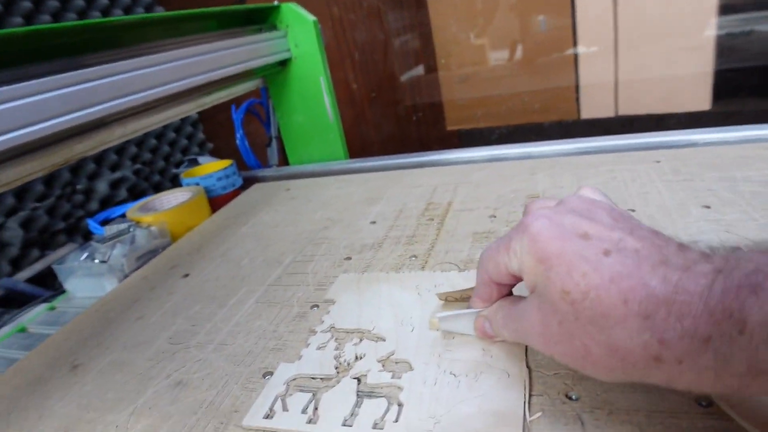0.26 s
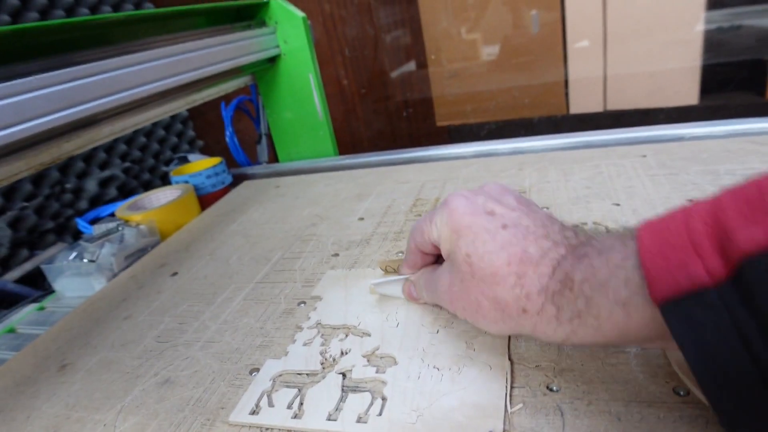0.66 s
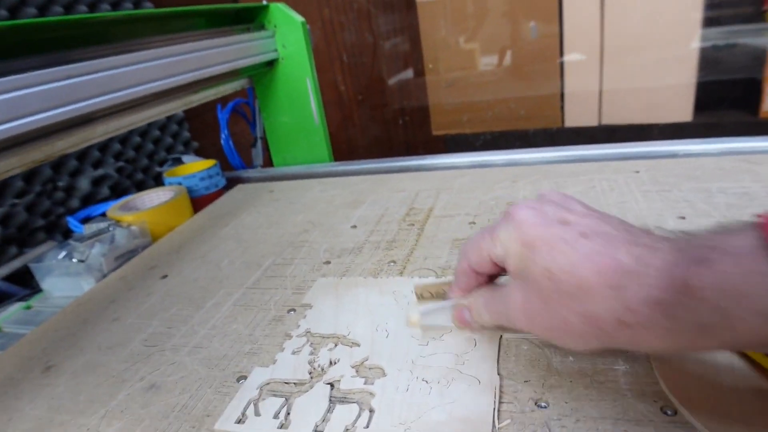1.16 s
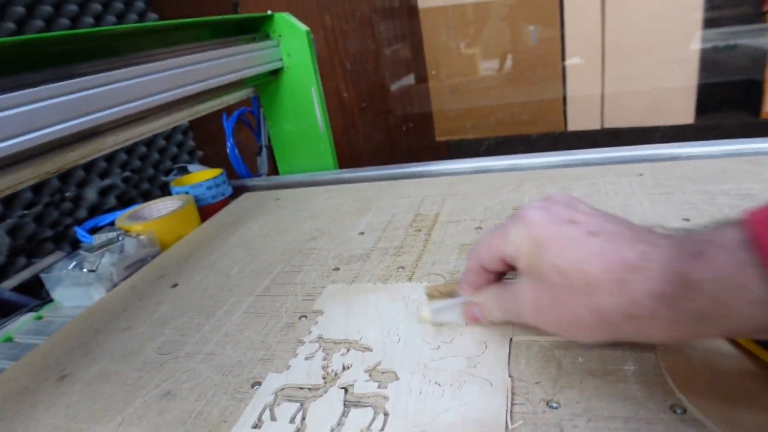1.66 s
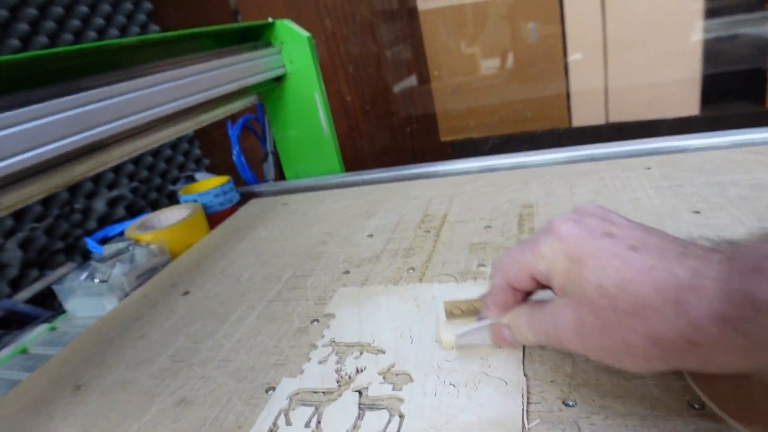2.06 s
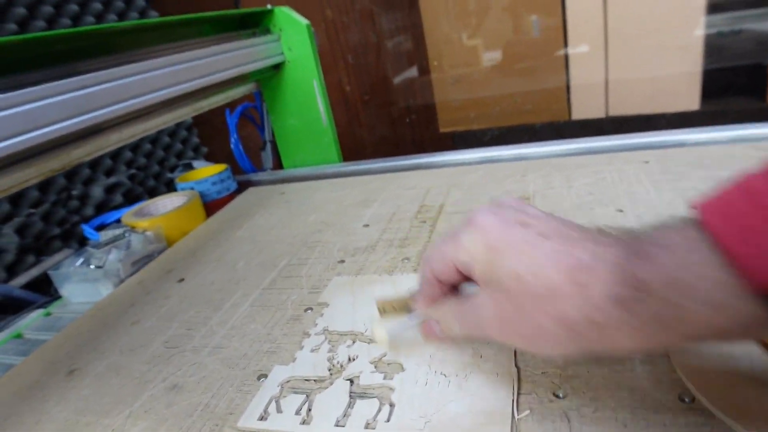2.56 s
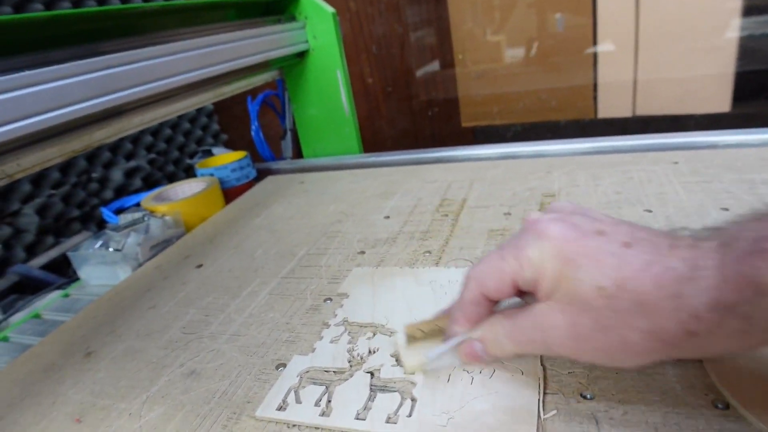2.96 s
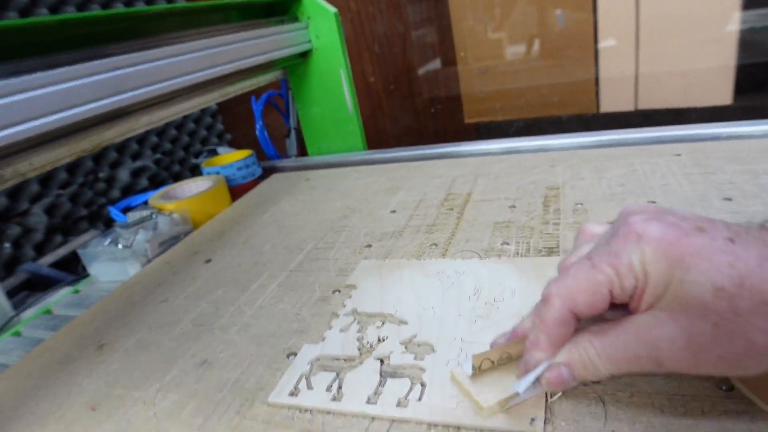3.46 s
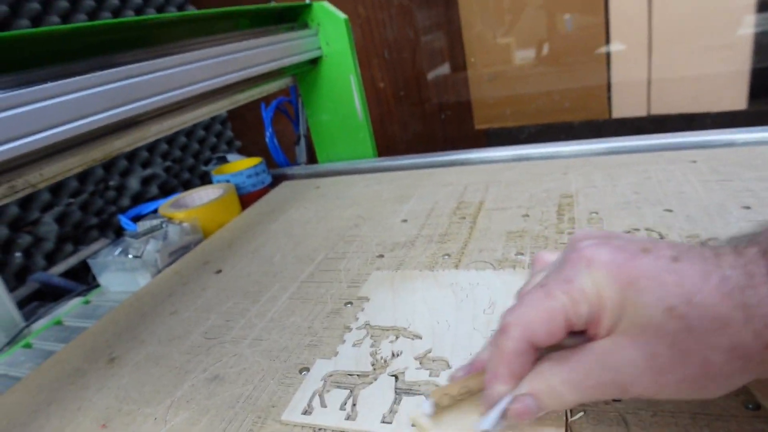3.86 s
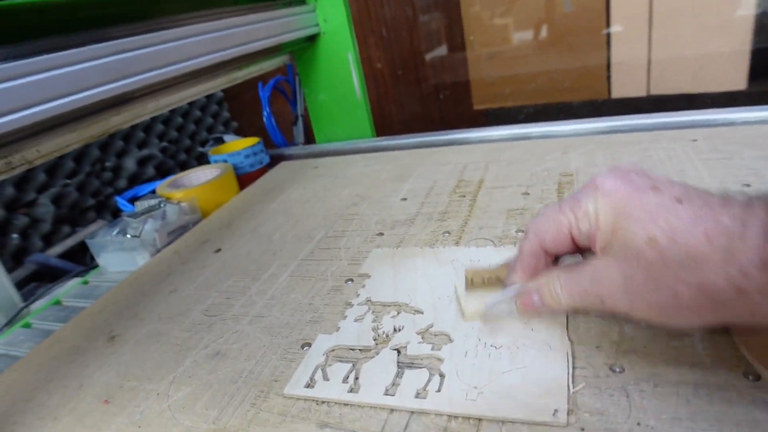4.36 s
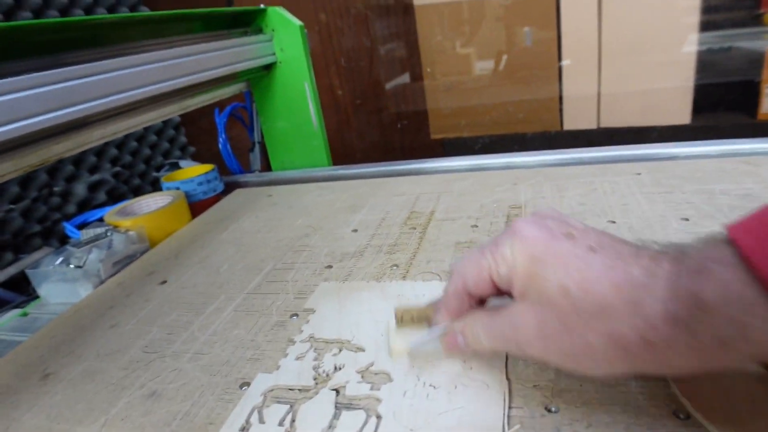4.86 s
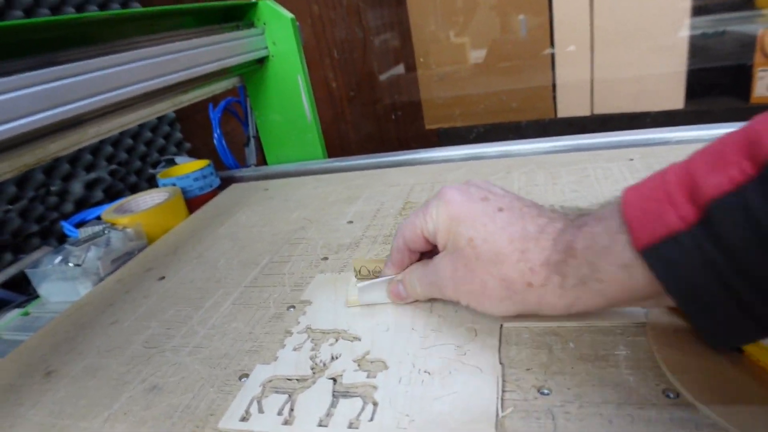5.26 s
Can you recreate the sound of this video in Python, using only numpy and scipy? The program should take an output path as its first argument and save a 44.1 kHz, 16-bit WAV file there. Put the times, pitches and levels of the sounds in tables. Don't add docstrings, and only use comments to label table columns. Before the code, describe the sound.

In a workshop, stiff bristles rasp back and forth over a thin wooden sheet right by a small microphone with little bass. An isolated early stroke leads to steady, rapid scrubbing. Light wooden ticks and dull knocks come irregularly, then a run of loud, bright clacks around the middle, easing back to plain scrubbing. Low machine hum, soft air and a very faint whine stay underneath.

```python
import sys
import numpy as np
from scipy import signal
from scipy.io import wavfile
from scipy.ndimage import uniform_filter1d

SR = 44100
rng = np.random.default_rng(int(sys.argv[2]) if len(sys.argv) > 2 else 0)


def bounce(signal):
    frames = np.transpose(np.atleast_2d(signal))
    limited = np.clip(frames, -1, 1)
    pcm = np.round(limited * 32767).astype(np.int16)
    wavfile.write(sys.argv[1], SR, pcm)


def voltage_ratio(decibels):
    exponent = np.asarray(decibels, float) / 20
    return 10 ** exponent


N = 243431


def evened(x):
    return x / np.sqrt(np.mean(x ** 2) + 1e-20)


def read(points, hz):
    f, value = np.transpose(points)
    return np.interp(np.log(hz + 1), np.log(f + 1), value)


def hump(hz, centre_hz, log_width):
    return np.exp(-(np.log((hz + 1) / centre_hz) / log_width) ** 2)


def add(mix, start_s, sound):
    part = mix[:, round(start_s * SR):][:, :sound.shape[-1]]
    part += sound[..., :part.shape[1]]


def decay(t, t60_s, rise_s):
    return voltage_ratio(-60 * t / t60_s) * (1 - np.exp(-t / rise_s))


def ring(hz, t60_s, rise_s, count=3000):
    t = np.arange(count) / SR
    return decay(t, t60_s, rise_s) * np.sin(2 * np.pi * hz * t)


def band(x, low_hz, high_hz):
    return evened(signal.lfilter(*signal.butter(2, [low_hz, high_hz], "bandpass", fs=SR), x))


def ports(pair, field_db, size=256):
    # frequency in Hz, left-right likeness (0-1).
    likeness = [(60, 1), (400, 0.98), (1500, 0.99), (2200, 0.97), (7000, 0.95), (8200, 0.9), (15000, 0.95)]
    # frequency in Hz, left minus right in dB.
    balance = [(60, 2), (1500, -1), (2200, -0.5), (7000, 1.5), (8200, -2), (12000, -4), (15000, -2.5)]
    hz, _, z = signal.stft(pair, SR, nperseg=size, noverlap=size * 3 // 4)
    apart = np.sqrt((1 - np.clip(read(likeness, hz), 0, 1)) / 2)[:, None]
    mid = np.sqrt(1 - apart ** 2) * z[0]
    side = apart * z[1]
    lean = voltage_ratio(read(balance, hz) / 2)[:, None]
    z = np.array([(mid + side) * lean, (mid - side) / lean]) * voltage_ratio(field_db(hz[:, None], z.shape[2]))
    return signal.istft(z, SR, nperseg=size, noverlap=size * 3 // 4)[1][:, :N]


def held(t):
    # time in s, weight on the sheet in dB, tip contact in dB, bristle ringing in Hz,
    # its swing along a push (0-1).
    grip_curve = [(0.0, 9.5, 4.5, 3800, .02), (0.11, 3, -1, 3960, .02), (0.4, -0.5, -1.5, 4200, 0),
                  (0.68, 3, 2, 3980, 0.14), (0.95, 4.5, 0.5, 4100, 0.02), (1.4, 2.5, 0, 3980, 0.16),
                  (2.0, 2, 0, 4440, 0), (2.3, 1.2, 2.5, 4250, 0.1), (3.05, 4, 2, 4070, 0),
                  (3.35, 0.5, -1, 4250, 0.12), (3.7, -1, -2, 4100, 0.04), (4.1, -2, -8.5, 4400, 0.03),
                  (4.2, 0, -8.5, 4150, 0.2), (4.32, 1, 2.5, 4170, 0.12), (4.62, -2.5, 2.3, 4480, 0.1),
                  (4.8, 1.5, 1.5, 4370, 0.02), (5.17, 0.7, -1, 4550, 0), (5.5, 0.5, -.2, 4600, 0.2)]
    s, *columns = np.transpose(grip_curve)
    return [np.interp(t, s, c) for c in columns]


def motion():
    # start in s, end in s, bristle pressure in dB,
    # lean to the end in dB.
    pushes = [(-0.085, 0.033, -31.0, -10.5), (0.336, 0.459, -32, 9.5), (0.612, 0.721, -27.5, 9),
              (0.879, 0.995, -28, 4), (1.151, 1.254, -26.5, 0), (1.389, 1.5, -29, 7.5),
              (1.645, 1.766, -28, 2), (1.904, 2.022, -27, 6.5), (2.163, 2.28, -27.5, 4.5),
              (2.423, 2.546, -26, 6), (2.705, 2.839, -26.5, 4), (2.999, 3.112, -28, 1.5),
              (3.277, 3.376, -29, 3.5), (3.528, 3.631, -27.5, 1.5), (3.768, 3.881, -29, 3.5),
              (4.027, 4.121, -34, 2), (4.263, 4.384, -28.5, -1), (4.501, 4.608, -29.5, 9),
              (4.731, 4.852, -30, 2.5), (4.979, 5.109, -31.5, 0), (5.232, 5.335, -32, 1),
              (5.458, 5.56, -30, 10)]
    # start in s, end in s, bristle pressure in dB, lean to the end in dB.
    pulls = [(0.043, 0.171, -30.5, -1.5), (0.469, 0.598, -31, 7.5), (0.739, 0.872, -29, 6),
             (1.009, 1.139, -28.5, 9.5), (1.27, 1.377, -31, 8.5), (1.518, 1.635, -31, 2.5),
             (1.781, 1.892, -32, 7), (2.037, 2.148, -32.0, 4.5), (2.292, 2.411, -29, 6.5),
             (2.562, 2.694, -28, 3.5), (2.86, 2.988, -30.5, 0), (3.128, 3.263, -27.5, 2),
             (3.4, 3.513, -29, 2.5), (3.648, 3.752, -31.5, 1.5), (3.889, 4.013, -32, 4.5),
             (4.142, 4.262, -37, -4), (4.394, 4.499, -31, 8), (4.622, 4.73, -31, 2),
             (4.861, 4.963, -32.5, 0.5), (5.116, 5.22, -33, 0), (5.348, 5.451, -31.5, 3)]
    # time in s, level in dB, length in s.
    touches = [
        (.2215, -40, 0.0059),
        (0.207, -69, .02),
        (0.278, -61, 0.023),
        (1.17, -63, .012),
        (3.628, -51, 0.0014),
        (4.527, -35.5, 0.018),
        (5.124, -39, 0.0076),
    ]
    usual_db = -30
    sheet_follows, tips_follow = 0.017, 0.12
    flip_after_s, flip_s, creep_db = 0.0095, 0.001, -3
    bite_db, bite_s = 2, 0.013

    t = np.arange(N) / SR
    rows = np.array(sorted(pushes + pulls))
    which = np.clip(np.searchsorted(rows[:, 0], t) - 1, 0, len(rows) - 1)
    start, end, db, lean_db = rows[which].T
    u = np.clip((t - start) / (end - start), 0, 1)
    speed = abs(np.sin(np.pi * u)) * (u < 1)
    gain = voltage_ratio(db + lean_db * (u - 0.5)) * speed ** (0.57 + 0.16 * u)

    since = t - start - flip_after_s
    flipped = 1 / (1 + np.exp(-np.clip(since / flip_s, -50, 50)))
    gain = gain * voltage_ratio(creep_db * (1 - flipped) + bite_db * flipped * np.exp(-abs(since) / bite_s))
    for touch_s, touch_db, length_s in touches:
        gain += voltage_ratio(touch_db) * (t > touch_s) * np.exp(-(abs(t - touch_s) / length_s) ** 3)

    weight_db, contact_db, _, _ = held((rows[:, 0] + rows[:, 1]) / 2)
    extra_db = rows[:, 2] - usual_db
    board_db = weight_db - (1 - sheet_follows) * extra_db
    tips_db = contact_db - (1 - tips_follow) * extra_db
    place = (2 * (which % 2) - 1) * np.cos(np.pi * u)
    return speed, gain, board_db[which], tips_db[which], which, place


def brush():
    # frequency in Hz, level in dB per Hz.
    scrub_colour = [(290, -48), (500, -14.5), (613, -39), (819, -14.5), (906, -17), (1360, -8),
                    (2040, -12.5), (3750, -3), (4660, -2.5), (5310, -3.5), (7860, 0), (9490, -4.5),
                    (12100, -5), (15100, -9.5), (16000, -70.5)]
    speed, gain, board_db, tips_db, which, place = motion()
    slips = (rng.random((N, 2)) < 14000 / SR) * rng.standard_normal((N, 2))
    slips = slips * voltage_ratio(2.7 * np.minimum(rng.exponential(1, (N, 1)), 2.5))
    tufts = evened(uniform_filter1d(rng.standard_normal(N), size=60))
    drive = (evened(slips) + 1.9 * rng.standard_normal((N, 2))).T * voltage_ratio(0.18 * tufts)
    grip = evened(uniform_filter1d(rng.standard_normal((which[-1] + 1, 129)), size=5, axis=1))

    def field(hz, frames):
        at = np.clip(np.arange(frames) * 64, 0, N - 1)
        patches = uniform_filter1d(rng.standard_normal((frames, len(hz))).T, size=4, axis=0)
        patches = evened(uniform_filter1d(patches, size=16, axis=1))
        low = 1 / (1 + (hz / 2300) ** 4)
        high = 1 / (1 + (8000 / (hz + 1)) ** 4)

        fast = speed[at] - 0.8
        bent = 1.34 * fast * (1 - low) * (1 - high)
        bent = bent - 8.1 * fast * low
        bent = bent + 5.0 * fast * high
        bent = bent + 0.34 * (1 - low) * np.tanh(np.gradient(speed[at]) * 30)
        bent = bent + 0.3 * (-0.5 - tips_db[at]) * hump(hz, 7400, 0.077)

        stroke = low * board_db[at] + high * tips_db[at]
        stroke = stroke + 1.1 * grip[which[at]].T

        weight_db, _, ring_hz, swing = held(at / SR)
        ring_hz = ring_hz * (1 + swing * place[at])
        pull = which[at] % 2
        ring_db = np.where(pull, 3.7, 4.5)
        under_db = np.where(pull, 4, 4.5) - 0.48 * weight_db
        bent = bent + ring_db * hump(hz, ring_hz, 0.25)
        bent = bent + under_db * hump(hz, 2500, 0.28)
        bent = bent + 0.85 * (weight_db - 2.0) / (1 + (hz / 1100) ** 6)
        return read(scrub_colour, np.minimum(hz, 15000)) + stroke + bent + 1.2 * patches

    return evened(ports(drive, field)) * gain


def fuzzy_tone(hz, width_hz, db):
    t = np.arange(N) / SR
    r = np.exp(-np.pi * width_hz / SR)
    z = rng.standard_normal((2, N)) + 1j * rng.standard_normal((2, N))
    for _ in range(2):
        z = signal.lfilter([1 - r], [1, -r], z)
    z = z[0] + 0.044 * np.array([z[1], -z[1]])
    return voltage_ratio(db) * evened((z * np.exp(2j * np.pi * hz * t)).real)


def room_air():
    # frequency in Hz, level in dB per Hz.
    air_colour = [(40, -46), (90, -48), (160, -34), (195, -3.5), (320, -9), (540, -23), (620, -39),
                  (1500, -12.5), (5500, -31), (10000, -54), (14000, -22), (16000, -37)]
    noise = rng.standard_normal((N, 2)).T
    air = ports(noise, lambda hz, frames: read(air_colour, hz), size=2048)
    return voltage_ratio(-65.5) * evened(air)


def fan():
    # frequency in Hz, width in Hz, level in dB rms.
    duct_modes = [
        (377.2, 30, -55),
        (402.4, 27.4, -57),
        (488, 40, -62),
        (89, 30, -83.5),
    ]
    return sum(fuzzy_tone(*row) for row in duct_modes)


def electronics():
    # time in s, level in dB rms.
    load_curve = [
        (0, -71),
        (2.4, -67),
        (3.4, -64),
        (4.3, -65),
        (5.5, -68),
    ]
    s, db = np.transpose(load_curve)
    return fuzzy_tone(15321, 5, np.interp(np.arange(N) / SR, s, db))


def coil():
    # frequency in Hz, width in Hz, level in dB rms.
    coil_tones = [
        (6013, 35, -62),
        (12015, 35, -72),
    ]
    end_s = 0.4
    fading = np.clip((end_s - np.arange(N) / SR) * 20, 0, 1)
    return fading * sum(fuzzy_tone(*row) for row in coil_tones)


def bumps():
    # time in s, peak in dB, pitch in Hz.
    hand_bumps = [(0.021, -51.5, 226), (0.082, -55, 230), (0.348, -46.5, 278), (0.419, -65, 194),
                  (0.669, -56, 248), (1.16, -54.5, 288), (1.461, -68.5, 218), (1.915, -59, 224),
                  (2.353, -57, 259), (2.434, -48, 234), (2.744, -53.5, 245), (2.822, -55.5, 208),
                  (3.034, -48, 252), (3.111, -58, 210), (3.21, -50, 226), (3.32, -49.5, 245),
                  (3.451, -74, 312), (3.586, -50, 233), (3.678, -64, 205), (3.819, -55.5, 223),
                  (3.905, -54, 208), (4.099, -48.5, 300), (4.301, -52, 196), (4.4, -55.5, 307),
                  (4.579, -55, 248), (4.748, -58, 221), (5.298, -52.5, 318)]
    out = np.zeros((2, N))
    t = np.arange(9000) / SR
    for s, db, hz in hand_bumps:
        shake = rng.standard_normal((2, 9000))
        rumble = band(shake, 0.81 * hz, 1.27 * hz)
        rumble = rumble[0] + 0.1 * rumble[1] * [[1], [-1]]
        add(out, s, voltage_ratio(db + 0.5) * rumble * decay(t, 0.3, 0.0012))
        tap = band(shake[1], 0.89 * hz, 2.9 * hz)
        add(out, s, voltage_ratio(db - 4) * tap * decay(t, 0.094, 0.0016))
    return out


def shudders():
    # time in s, peak in dB, pitch in Hz.
    bed_shudders = [
        (0.033, -55, 83.4),
        (1.176, -71, 86),
        (1.421, -80, 75.4),
        (2.372, -68, 102),
        (3.027, -75.5, 129),
        (4.092, -73, 114),
        (4.305, -56, 100),
        (4.538, -67, 118),
        (4.733, -73, 64.6),
    ]
    out = np.zeros((2, N))
    for s, db, hz in bed_shudders:
        add(out, s, voltage_ratio(db + 3.0) * ring(hz, 0.33, 0.013, count=14000) * [[0.75], [1.0]])
    return out


def flicks():
    # time in s, peak in dB, pitch in Hz.
    cutout_flicks = [(0.049, -54, 1160), (1.159, -49, 1230), (1.612, -36, 1195), (2.364, -36.5, 1310),
                     (2.434, -46, 1290), (2.865, -49, 1280), (3.135, -46, 1400), (3.207, -31.5, 1277),
                     (4.751, -51, 1040), (5.128, -47, 1360), (5.305, -38.5, 1300)]
    out = np.zeros((2, N))
    for s, db, hz in cutout_flicks:
        flick = ring(hz, 0.03, 0.00026)
        flick = flick + 2.13 * ring(0.66 * hz, 0.0089, 0.00049)
        flick = flick + 0.58 * ring(0.5 * hz, 0.0095, 0.0011)
        flick = flick + 0.5 * ring(0.394 * hz, 0.028, 0.0025)
        flick = flick + 0.044 * ring(0.201 * hz, 0.023, 0.0066)
        add(out, s, voltage_ratio(db + 4.0) * flick)
    return out


def snaps():
    # time in s, peak in dB, left minus right in dB, thud relative to it in dB.
    handle_snaps = [(0.083, -39, -2, -23), (0.349, -23.5, 2, -22), (0.5702, -40, -12, -17),
                    (0.8015, -53, -1, -26), (1.0331, -34, 14, -18), (1.2853, -33, 0.0, -22),
                    (1.8194, -40, 2, -26), (2.0827, -44, 0.0, -17), (2.3294, -38, 4, -23),
                    (2.575, -34, 9, -19), (2.8223, -14.5, -4, -14), (3.106, -11, 0, -17),
                    (3.3806, -11.5, 0.5, -12), (3.6332, -9, -1, -15), (3.9006, -15, 3, -17),
                    (4.157, -24, -8, -24)]
    # frequency in Hz, level in dB, T60 in s.
    handle_modes = [
        (1430, -22, .012),
        (2600, -7, .004),
        (3450, -1, .006),
        (4420, 0, .0045),
        (5300, -2, .003),
        (6840, 0, .0035),
        (9200, -8, .002),
        (13000, -12, .0015),
    ]
    out = np.zeros((2, N))
    for s, db, pan_db, thud_db in handle_snaps:
        a, b = rng.random(2)
        snap = np.zeros(3000)
        for k, (hz, mode_db, t60_s) in enumerate(handle_modes):
            snap += (-1) ** k * voltage_ratio(mode_db) * ring(hz * (0.795 + 0.26 * a), t60_s, 0.0001)
        snap = snap + 0.4 * np.roll(snap, 27) + 0.25 * np.roll(snap, 61)
        snap = snap / abs(snap).max() * voltage_ratio(np.array([[pan_db], [-pan_db]]) / 2)
        late = np.roll(snap[1], 2)
        add(out, s + 0.00053, voltage_ratio(db) * np.array([snap[0], late]))

        thud = ring(260 + 120 * b, 0.043, 0.0092)
        thud = thud + 0.43 * ring(700 + 300 * a, 0.031, 0.00074)
        thud = thud + 0.5 * ring(1320, 0.027, 0.00017)
        add(out, s, voltage_ratio(-15.5 + thud_db) * thud * [[1.0], [-0.6]])
    return out


def knocks():
    no_bass = signal.butter(2, 170, "highpass", fs=SR, output="sos")
    return bumps() + shudders() + signal.sosfilt(no_bass, flicks() + snaps())


def workshop(x):
    t60_s, dull_hz = 0.19, 11000
    low_t60_s, low_hz = 0.24, 1400
    t = np.arange(12000) / SR
    taps = np.zeros((2, 12000))
    at = np.arange(150, 11980, 20) + rng.integers(0, 20, (2, 592))
    np.put_along_axis(taps, at, rng.choice([-1., 1.], at.shape), 1)
    bright = signal.lfilter(*signal.butter(1, dull_hz, fs=SR), taps[0] * voltage_ratio(-60 * t / t60_s))
    low = signal.lfilter(*signal.butter(4, low_hz, fs=SR), taps * voltage_ratio(-60 * t / low_t60_s))
    tail = bright + 2.03 * (low[0] + 0.12 * np.array([low[1], -low[1]]))
    return signal.fftconvolve(x.mean(0)[None], tail / np.linalg.norm(tail[0]), axes=1)[:, :N]


def scene():
    work = brush() + knocks()
    machines = room_air() + fan() + electronics() + coil()
    return work + voltage_ratio(-18) * workshop(work) + machines


def top_cut(x):
    return signal.sosfilt(signal.butter(12, 16530, fs=SR, output="sos"), x)


def record(dry):
    dry = signal.sosfilt(signal.butter(3, 70, "highpass", fs=SR, output="sos"), dry)
    edge = signal.firwin(1023, 15740, window=("kaiser", 9), fs=SR)
    return top_cut(signal.oaconvolve(dry, edge[None], "same"))


dry = scene()
out = record(dry)
bounce(out)
```